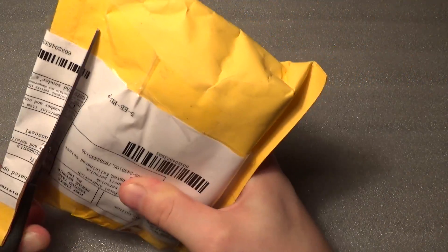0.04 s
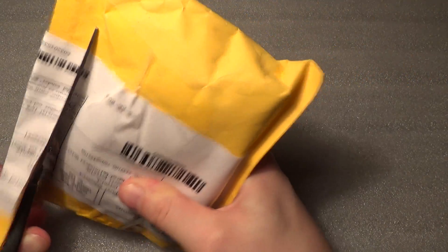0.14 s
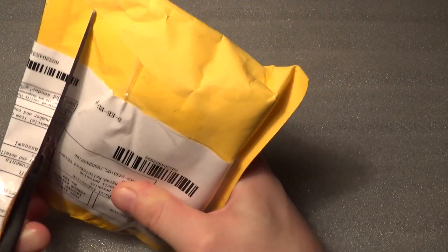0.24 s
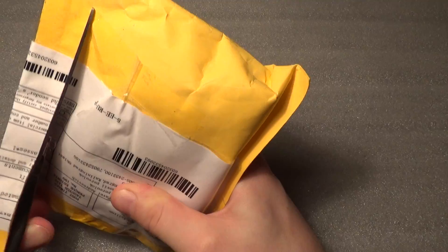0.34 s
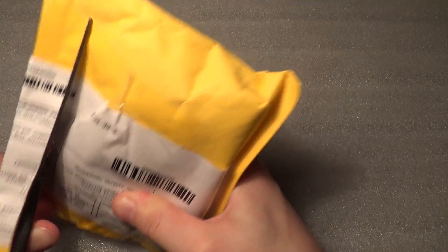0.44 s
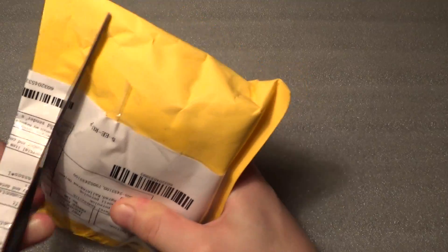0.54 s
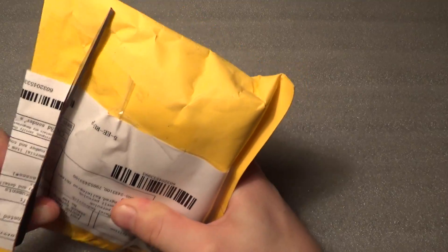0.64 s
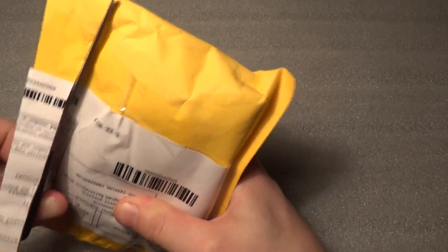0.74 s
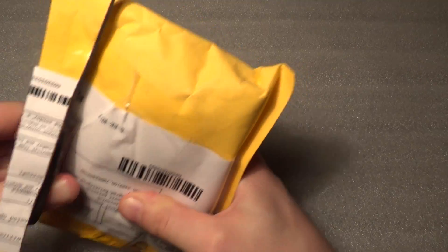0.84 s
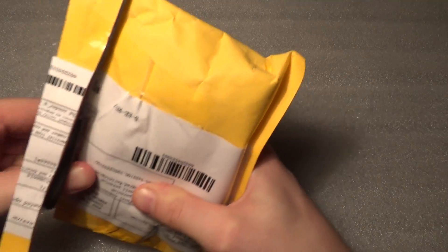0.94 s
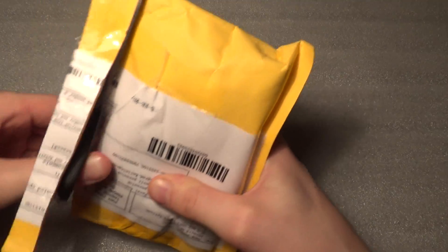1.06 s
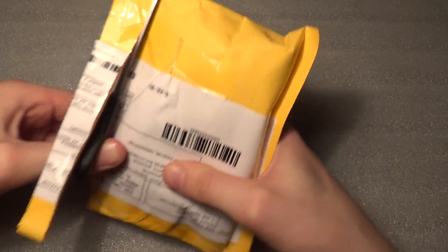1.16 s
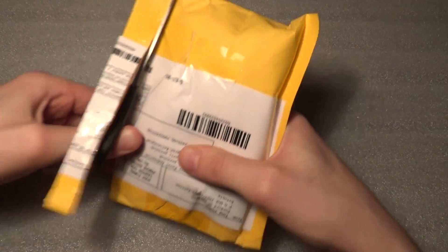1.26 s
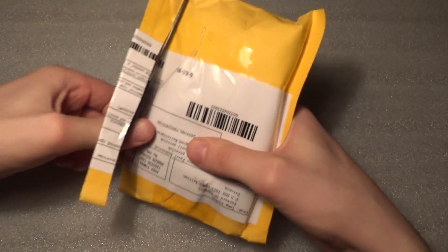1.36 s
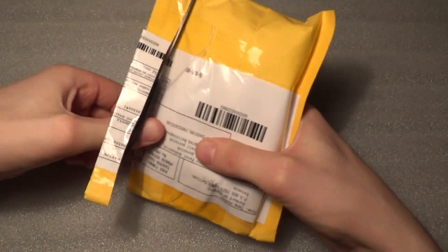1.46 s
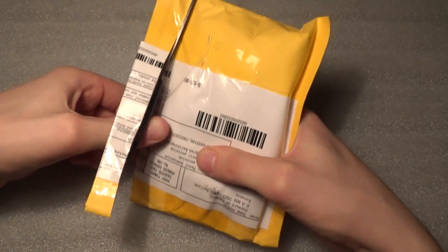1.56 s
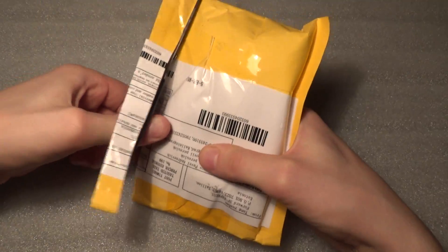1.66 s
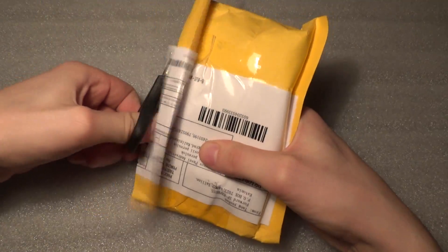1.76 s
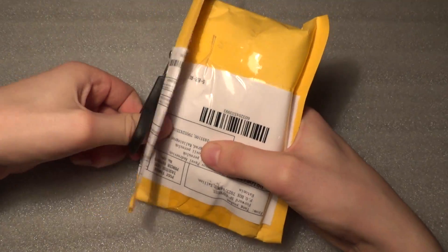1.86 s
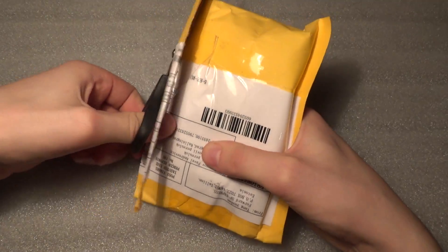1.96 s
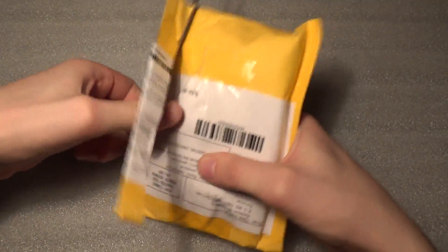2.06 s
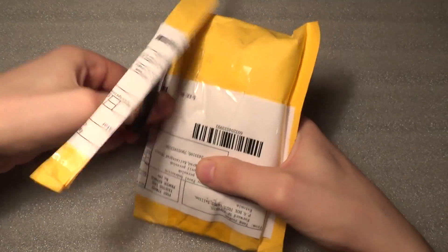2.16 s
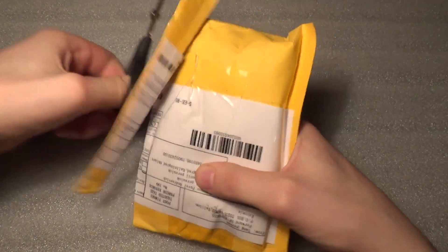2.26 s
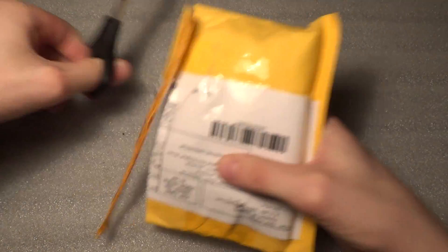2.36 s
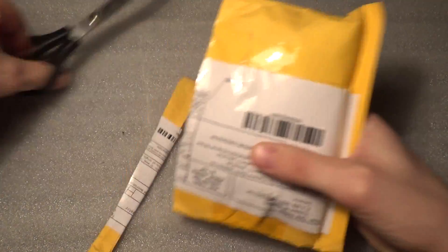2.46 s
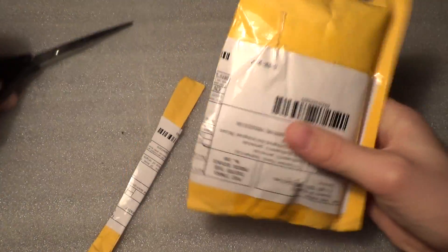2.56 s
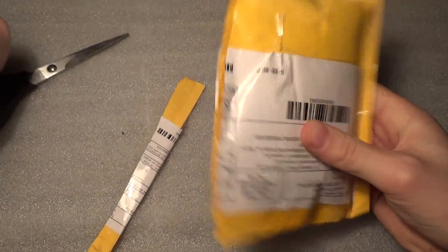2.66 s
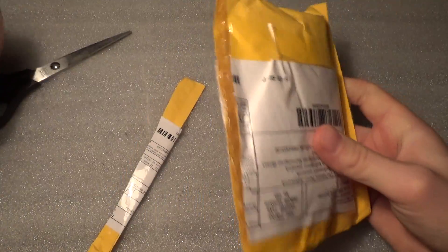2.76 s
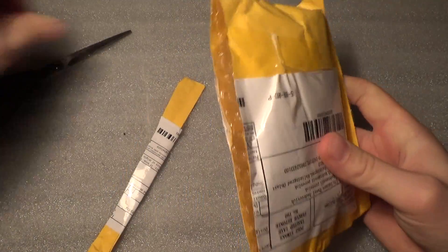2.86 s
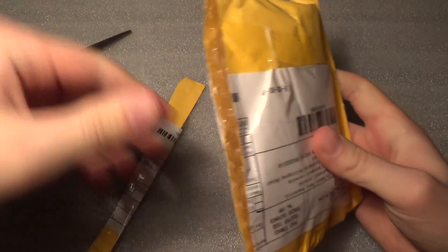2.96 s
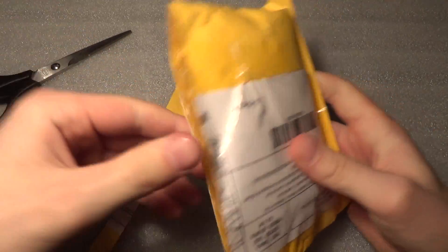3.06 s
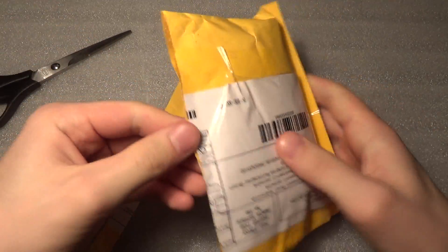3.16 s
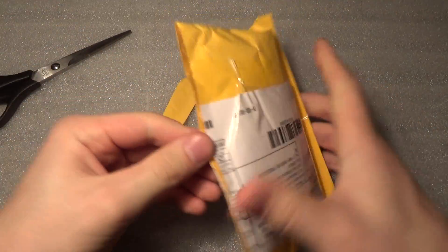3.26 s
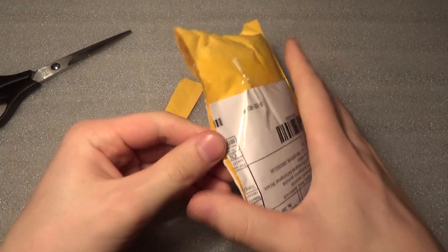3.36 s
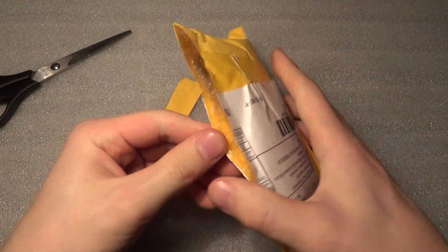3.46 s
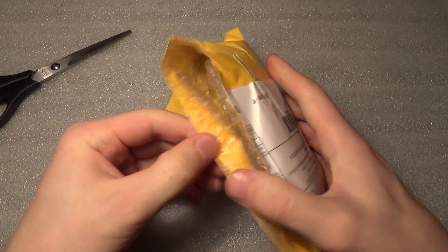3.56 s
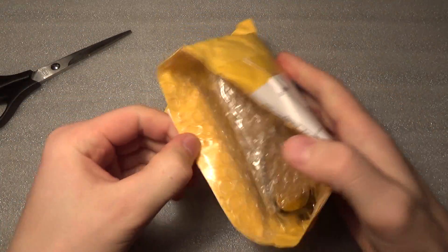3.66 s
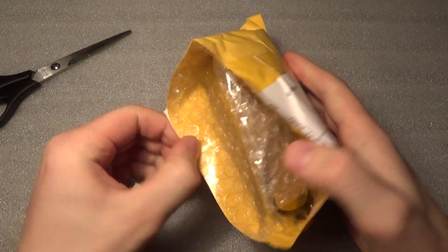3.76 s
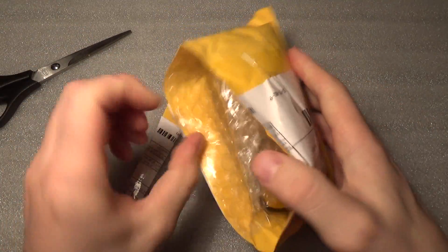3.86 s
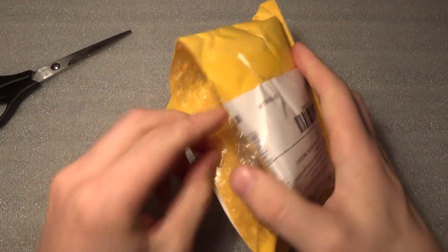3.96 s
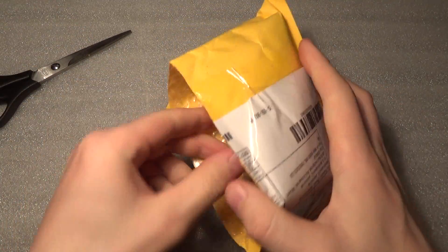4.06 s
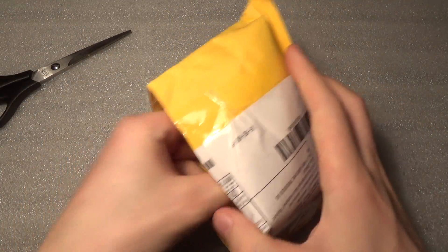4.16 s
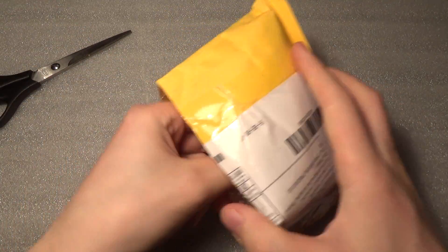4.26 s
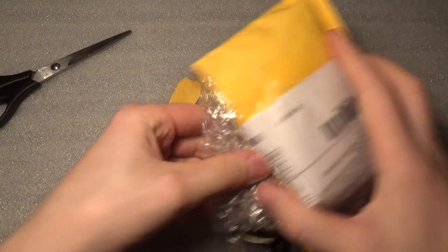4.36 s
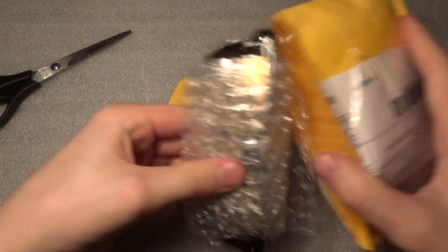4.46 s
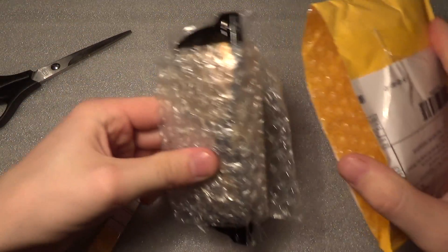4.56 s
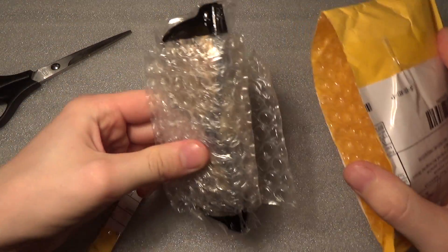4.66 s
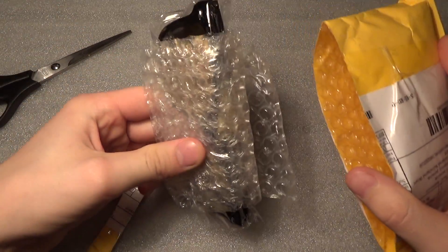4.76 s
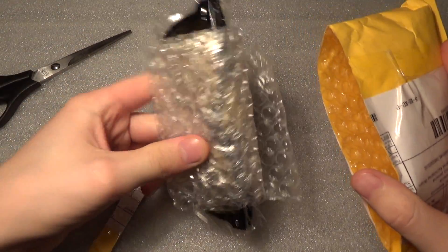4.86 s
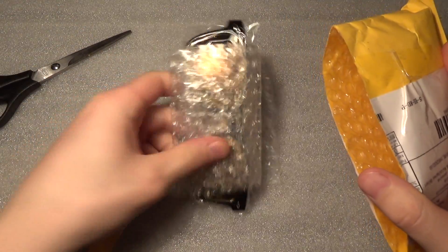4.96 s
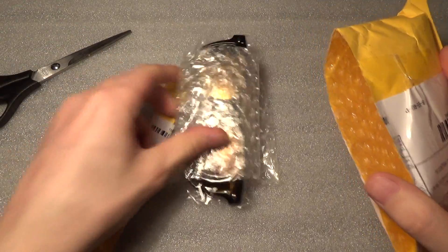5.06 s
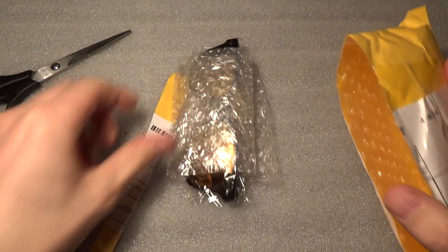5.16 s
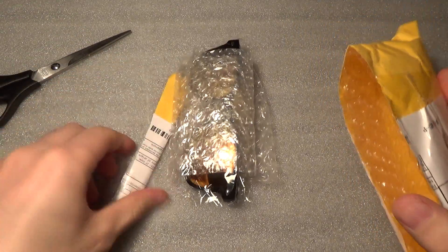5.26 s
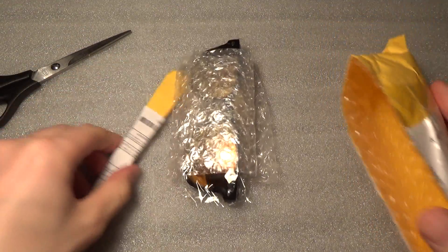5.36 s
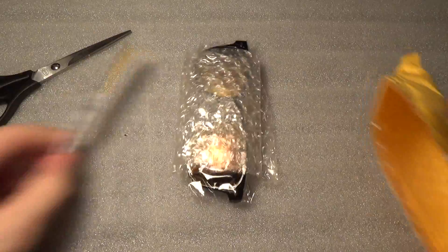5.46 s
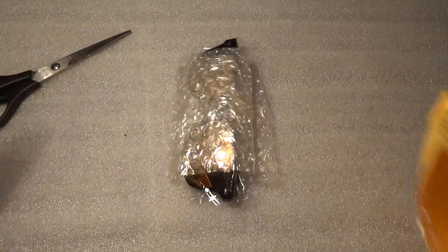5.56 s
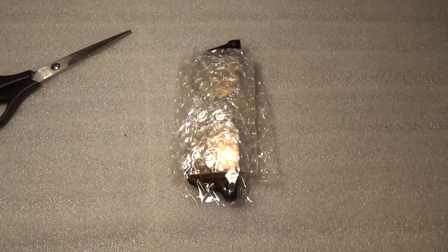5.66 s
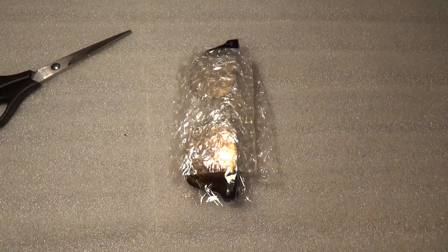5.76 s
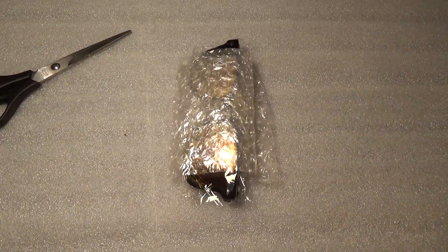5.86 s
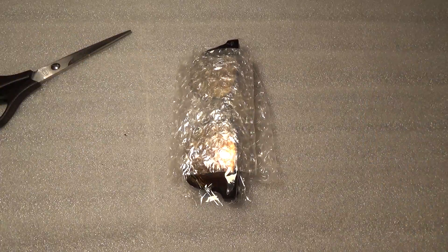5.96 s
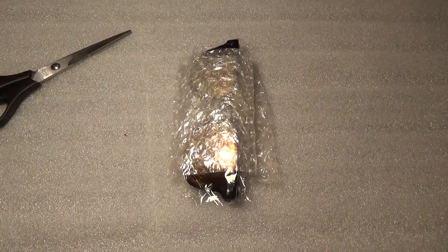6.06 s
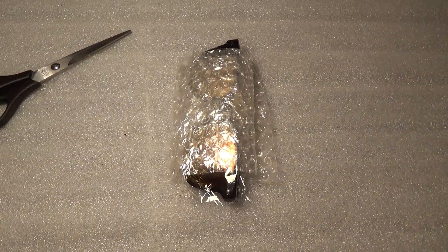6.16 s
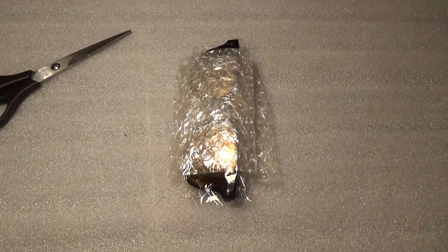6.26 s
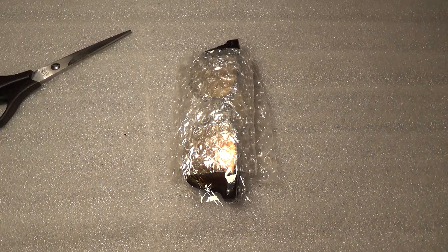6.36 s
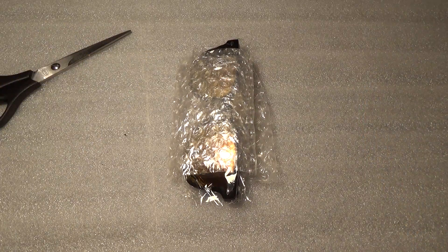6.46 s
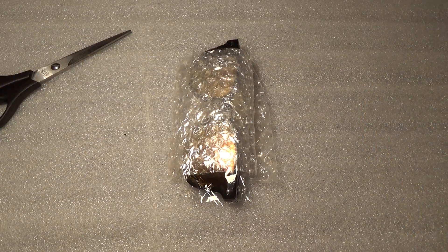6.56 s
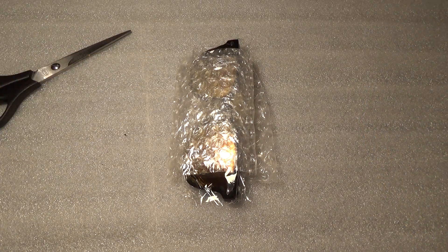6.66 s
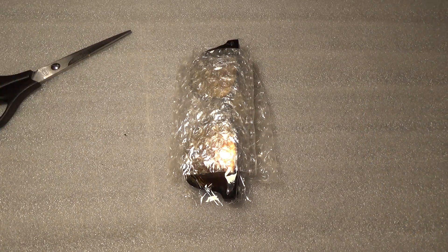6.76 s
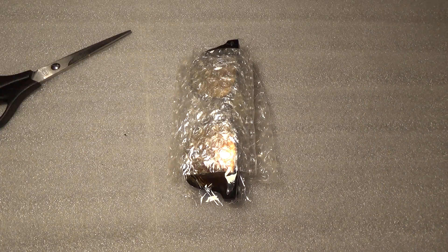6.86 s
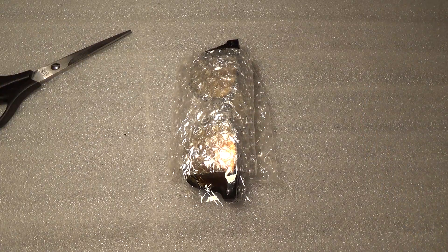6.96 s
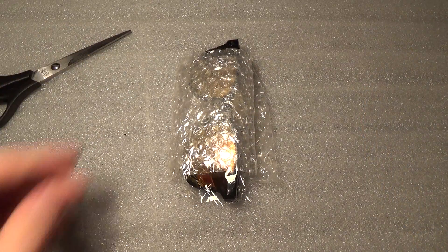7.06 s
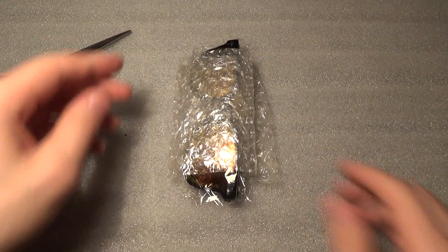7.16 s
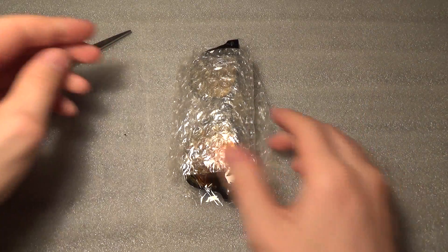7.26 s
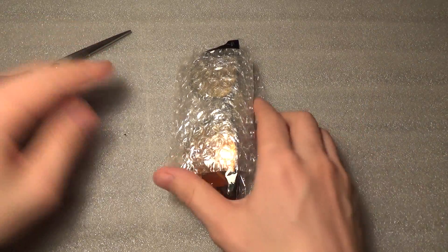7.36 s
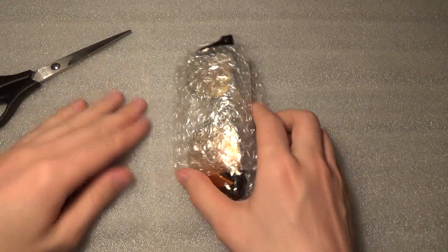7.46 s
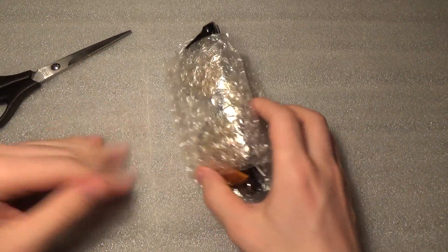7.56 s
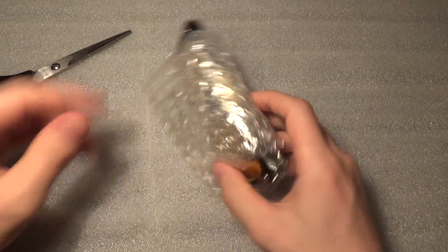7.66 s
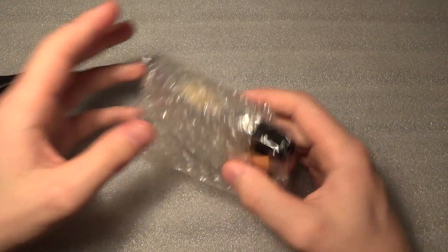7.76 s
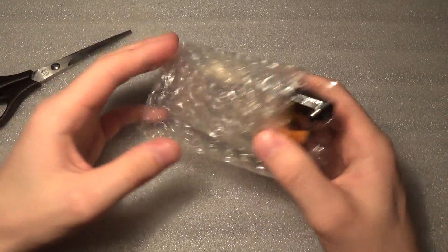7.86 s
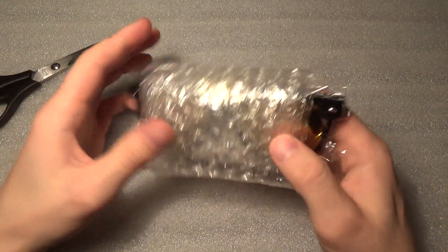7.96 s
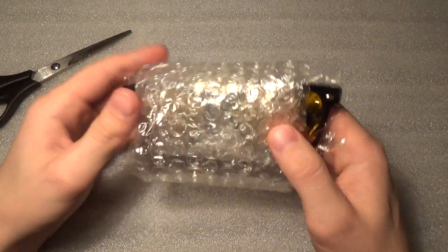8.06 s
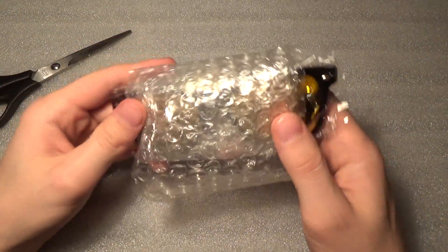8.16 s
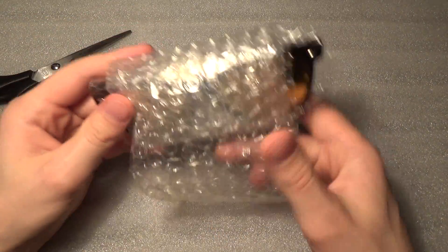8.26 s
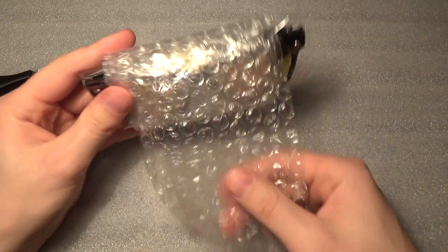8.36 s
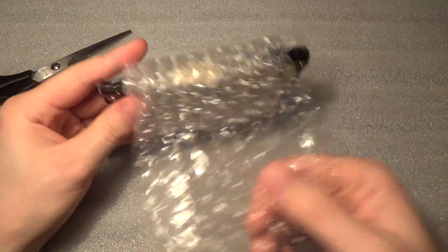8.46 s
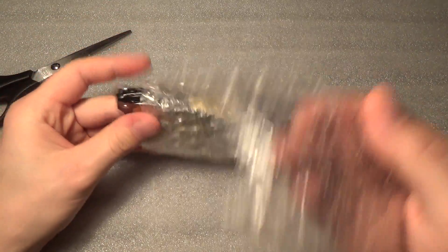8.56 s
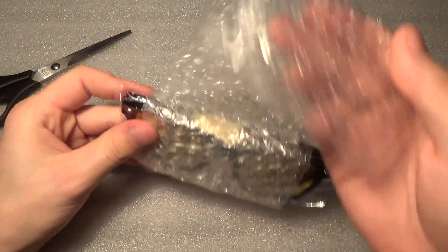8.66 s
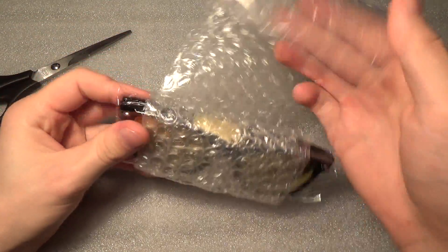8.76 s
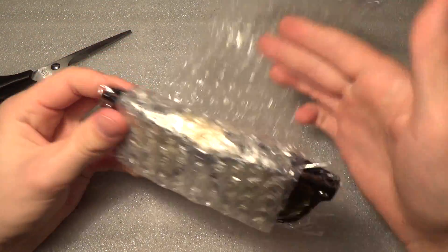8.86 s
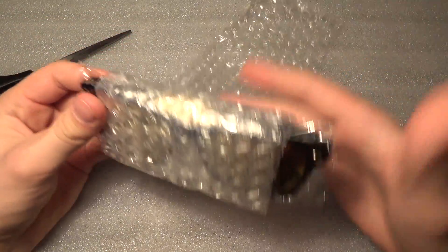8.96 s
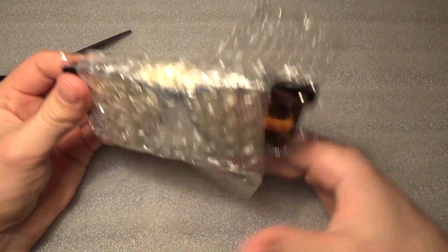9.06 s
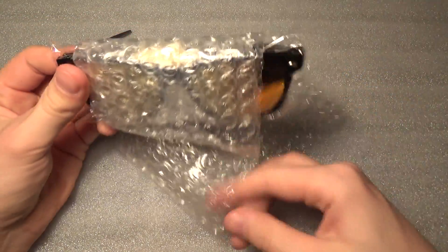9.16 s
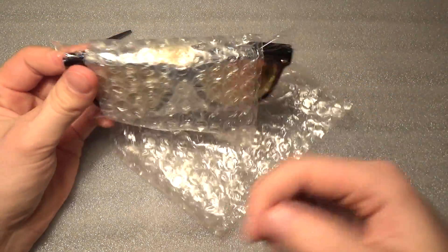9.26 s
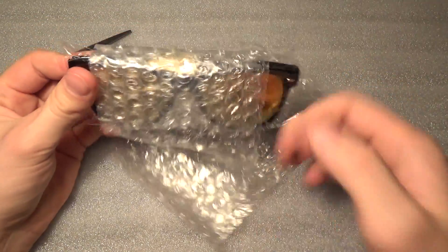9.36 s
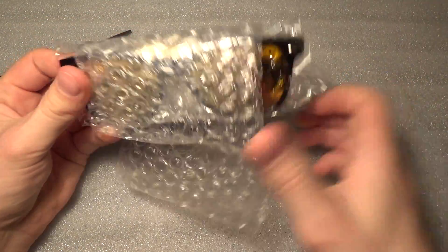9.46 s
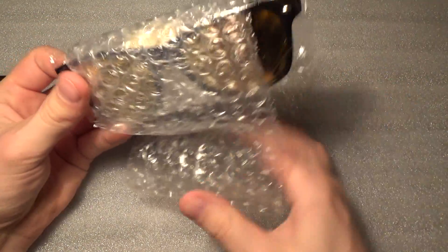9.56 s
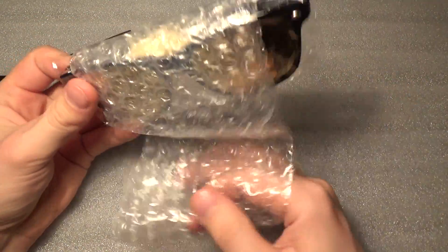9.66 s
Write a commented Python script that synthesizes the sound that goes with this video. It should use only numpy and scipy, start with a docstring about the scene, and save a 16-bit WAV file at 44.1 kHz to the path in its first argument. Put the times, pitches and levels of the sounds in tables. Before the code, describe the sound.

Recorded close in a small, dry, quiet room with soft air noise and a very faint low hum. From 0 to 1.2 seconds, scissors bite through a padded paper envelope: short, rough, crunchy bursts, loudest around 0.5, with dull knocks at 0.1 and 0.35 and a hard snap near 0.7. Lighter slides follow, with a sharp snap and thump at 1.8 and small rustles to 3.2. At 3.5 to 3.9 a tight cluster of bright plastic ticks sounds as the envelope opens, then a boomy paper crunch and knock around 4.2 and rustling as the packet slides out until about 5.3. Soft taps at 5.7, 6.3 and 7.0 punctuate near silence. From 7.3 to the end near 9.8, bubble wrap is handled and unrolled: thin, high, fizzy crinkling in irregular swells, with many crisp snaps, strongest around 7.8 and 8.8 to 9.1.

```python
"""Padded paper envelope cut open with scissors; a bubble-wrapped object is pulled out and unwrapped on a table.
Sheets rub (dense fine slips heard as hiss) and buckle (separate snaps, each a burst of noise with a pitch).
Stiff paper booms low through the envelope's modes; thin film fizzes high; the packet knocks on table or hand.
A small quiet room adds sparse reflections, soft air noise and a faint hum; a close microphone pair hears it all."""
import sys
import numpy as np
from scipy import signal
from scipy.io import wavfile
from scipy.ndimage import uniform_filter1d

SR = 44100
rng = np.random.default_rng(int(sys.argv[2]) if len(sys.argv) > 2 else 0)


def master(y):
    """Save y as 16-bit WAV."""
    cut = np.clip(np.atleast_2d(y).T, -1, 1)
    pcm = np.round(cut * 32767)  # scale
    wavfile.write(sys.argv[1], SR, pcm.astype(np.int16))


N = 428211  # samples


def gain_of(db):
    """Logarithmic level: converts decibels to an amplitude factor."""
    return 10 ** (np.asarray(db) / 20)


def evened(x):
    """Normalisation: scales a signal to rms 1."""
    return x / np.sqrt(np.mean(x ** 2) + 1e-20)


def curves(rows):
    """Linear interpolation: turns the columns of a timed table into one value per sample."""
    s, *columns = np.transpose(rows)
    return [np.interp(np.arange(N) / SR, s, column) for column in columns]


def band(x, hz, kind):
    """Zero-phase filtering: keeps the part of a sound below ("low") or above ("high") hz."""
    return signal.sosfiltfilt(signal.butter(2, hz, kind, fs=SR, output="sos"), x)


def coloured(x, points):
    """Minimum-phase filtering: imposes a spectrum causally, so clicks stay sharp."""
    f, db = np.transpose(points)
    hz = abs(np.fft.fftfreq(8192, 1 / SR))
    log_gain = np.log(gain_of(np.interp(np.log(hz + 1), np.log(f + 1), db)))
    phase = -signal.hilbert(log_gain).imag
    taps = np.fft.ifft(np.exp(log_gain + 1j * phase)).real[:4096]
    return signal.oaconvolve(x, taps[None], axes=1)[:, :N]


def wander(ms):
    """Smoothed random process: slow chance of rms 1 that changes over the given milliseconds."""
    size = max(round(ms * SR / 1000), 2)
    once = uniform_filter1d(rng.standard_normal(N), size)
    return evened(uniform_filter1d(once, size))


def spread(x, db):
    """Level difference between channels: places a sound left by db (right if negative)."""
    return x * gain_of([db / 2, -db / 2]).reshape(2, -1)


def fold(hz, ring_ms, tone, noise):
    """Impulsive buckling: a noise crack decays exponentially, partly resonating at the pitch of the fold."""
    crack = noise * np.exp(-1000 * np.arange(len(noise)) / SR / ring_ms)
    ring = signal.lfilter(*signal.iirpeak(hz, 3, SR), crack)
    zero, pole = np.exp(-2 * np.pi * np.array([.2, 3]) * hz / SR)
    unpitched = signal.lfilter([1, -zero], [1, -pole], crack)  # a broad rise around the pitch
    return tone * ring / np.linalg.norm(ring) + (1 - tone) * unpitched / np.linalg.norm(unpitched)


# modes at which the padded envelope rings dully: pitch_hz [Hz], level_db [dB]
ENVELOPE_MODES = [(410, -2), (660, 1), (1060, -2), (1310, 2)]


def panel(x):
    """Modal resonance: a push on the padded envelope, with the modes it rings."""
    modes = [gain_of(db) * signal.lfilter(*signal.iirpeak(hz, 9, SR), x) for hz, db in ENVELOPE_MODES]
    return x + sum(modes)


# each scissor cut, slide or crunch of the sheets:
# start_s [s], length_s [s], effort_db [dB], paper_boom_db [dB re effort]
MOVES = [(0.029, 0.039, -35, 2), (0.183, 0.06, -32, -4), (0.287, 0.095, -38, -2.5),
         (0.341, 0.018, -27.5, 1), (0.478, 0.054, -21.5, -16.5), (0.569, 0.14, -40, 3.5),
         (0.627, 0.047, -29, -2.5), (0.771, 0.062, -27.5, -11.5), (0.899, 0.077, -37, 0),
         (1.076, 0.018, -31.5, -9), (1.147, 0.011, -33, -3), (1.175, 0.15, -54, 3),
         (1.52, 0.069, -40, -9.5), (1.785, 0.014, -34, -3), (2.073, 0.043, -37.5, -1),
         (2.13, 0.084, -46.5, 2.5), (2.329, 0.031, -48, -0.5), (2.539, 0.19, -46, -6),
         (3.116, 0.17, -48.5, -3), (3.656, 0.086, -35.5, -3), (3.608, 0.01, -21.5, -6),
         (4.012, 0.069, -51, -12), (4.164, 0.03, -31, 6), (4.274, 0.24, -35.5, -3), (4.445, 0.051, -33, 5),
         (4.868, 0.14, -46, -15.5), (4.999, 0.029, -35, -4), (5.013, 0.13, -42, -14),
         (5.293, 0.18, -45, -13), (5.706, 0.014, -41.5, 5), (5.984, 0.077, -45.5, -8.5),
         (6.157, 0.029, -40, -5.5), (6.205, 0.057, -47.5, 4), (6.934, 0.087, -50, 5),
         (7.306, 0.082, -47.5, -24), (7.434, 0.24, -41.5, -12), (7.555, 0.066, -32, -16),
         (7.775, 0.021, -32.5, 0), (8.081, 0.57, -44, -12), (8.323, 0.051, -38, -6),
         (8.385, 0.068, -35.5, -5.5), (8.701, 0.18, -44.5, -10), (8.783, 0.056, -34, -7),
         (8.936, 0.11, -40.5, -13), (9.06, 0.23, -42.5, -8.5), (9.321, 0.16, -41.5, -9.5),
         (9.556, 0.064, -40.5, -13), (9.653, 0.048, -36.5, -1.5)]
# the sheets rustling in the hands between moves:
# start_s [s], effort_db [dB], film_fizz_db [dB re any effort]
HOLDING = [(0, -43.5, -6.5), (.44, -67, -8.5), (.75, -50, -8), (1.04, -62.5, -2.5), (1.3, -55.5, -3),
           (1.98, -64, 4), (2.3, -50.5, 1), (3.0, -63.5, -5.5), (3.3, -54, -2), (3.97, -46.5, 5),
           (4.2, -40, -1.5), (4.65, -52.5, 2.5), (5.24, -57.5, 3), (5.85, -68, 3), (6.25, -56, 4.5),
           (6.75, -70.5, -2.5), (7.28, -66, 1), (7.7, -49, 3), (9.71, -56.5, 1.5)]
HOLDING_BOOM_DB = -5.5  # re the holding effort
ATTACK_S, SWELL = 0.01, 0.041  # SWELL: share of a move's length added to its rise
SAG_DB = 2.5  # fall from start to end of a move
RELEASE_DB_PER_S, SETTLE_DB, SETTLE_DB_PER_S = 2191, -9, 278


def effort():
    """Addition of powers: moves snap on, sag, let go fast and settle slower over the rustle.

    Returns crease level, boom and fizz, and how far the moves lift the level above the rustle, all in dB.
    """
    rest_db, film_db = curves(HOLDING)
    creases = gain_of(2 * rest_db)  # doubled dB gives power
    paper = gain_of(2 * (rest_db + HOLDING_BOOM_DB))
    for start, length, db, move_boom_db in MOVES:
        first = round(start * SR)
        t = np.arange(0, length + .3, 1 / SR)[:N - first]
        after = np.maximum(t - length, 0)
        settling = (after > 0) * gain_of(SETTLE_DB - SETTLE_DB_PER_S * after)
        release = gain_of(-RELEASE_DB_PER_S * after) + settling
        rise = np.minimum(t / (ATTACK_S + SWELL * length), 1)
        sag = SAG_DB * (np.minimum(t / length, 1) - .5)
        shape = rise * gain_of(db - sag) * release
        creases[first:][:len(t)] += shape ** 2
        paper[first:][:len(t)] += (gain_of(move_boom_db) * shape) ** 2
    effort_db = 10 * np.log10(creases)
    return effort_db, 10 * np.log10(paper / creases), film_db, effort_db - rest_db


def rub(effort_db):
    """Stick-slip friction: slips too dense to count, a hiss that flutters, smoother the harder the rub."""
    both, left, right = rng.standard_normal((3, N))
    hiss = both + .25 * np.array([left, right])
    slow_flutter_db = np.clip(-.12 * (effort_db + 28), 0, 3)
    return evened(hiss * gain_of(2.46 * wander(ms=5.5) + slow_flutter_db * wander(ms=21.6)))


def crackle(per_s, size_db, count):
    """Random impulse process: folds of many pitches buckle in clumps; a few are much larger than the rest."""
    rate = per_s * gain_of(6.6 * wander(ms=25))
    happens = rng.random(N) < rate / SR
    sizes = gain_of(size_db * np.minimum(rng.exponential(1, N), 3.2)) * happens
    which, out = rng.integers(0, count, N), np.zeros((2, N))
    for k, hz in enumerate(np.geomspace(1500, 14500, count)):
        grain = fold(hz, rng.uniform(.15, .9), .6, rng.standard_normal(400))
        buckles = signal.oaconvolve(sizes * (which == k), grain)[:N]
        out += spread(buckles, 2 * rng.standard_normal())
    return evened(out)


# spectrum of the sheets as the microphone colours them: frequency_hz [Hz], level_db [dB per Hz]
SHEET = [(59, -68), (100, 2.5), (271, 3.5), (500, 0.5), (659, 3), (797, 1.5), (5500, 1), (6400, -10),
         (7400, -3.5), (11500, 0), (15800, -8.5)]
# spans in which moves do not reduce the share of crackle: start_s [s], end_s [s]
WRAP_IN_HAND = [(3.48, 5.2), (7.3, 9.8)]
PAPER_HZ, FILM_HZ, FIZZ_HZ = 1300, 6500, 11000  # top of the boom, bottom of the film, its upper fizz


def sheets():
    """Band-wise radiation: rub and crackle, shared out to paper, creases and film by the hands' effort."""
    effort_db, paper_db, film_db, over_db = effort()
    paper_db = paper_db + 3.3 * wander(ms=78)  # creases keep shifting the colour
    film_db = film_db + 3.3 * wander(ms=51)

    # snappy is crackle's share of the power; resting sheets hiss
    snappy = np.clip(0.5 + 0.025 * film_db, 0, 1) * np.clip((effort_db + 70) / 16, 0, 1)
    wrap = sum((np.arange(N) > a * SR) & (np.arange(N) < b * SR) for a, b in WRAP_IN_HAND)
    snappy = snappy * np.where(wrap, 1, gain_of(-3 - .6 * over_db))  # film buckles, sliding paper hisses
    rubbing = np.sqrt(1 - snappy) * rub(effort_db)
    buckling = np.sqrt(snappy) * crackle(230, 3.0, count=24)
    motion = coloured(rubbing + buckling, SHEET)

    low = band(band(motion, PAPER_HZ, "low"), 225, "high")
    high = band(motion, FILM_HZ, "high")
    creases = evened(band(motion - low - high, 550, "high"))
    boom = gain_of(paper_db) * evened(panel(low))
    film = evened(high)
    film = film + (gain_of(0.61 * film_db) - 1) * band(film, FIZZ_HZ, "high")  # paper lacks the top
    fizz = gain_of(film_db) * film
    # hands and packet shake the table
    rumble = evened(band(band(rng.standard_normal(N), 180, "low"), 55, "high")) * gain_of(paper_db - 23)
    return gain_of(effort_db) * (creases + boom + fizz + rumble)


# spectrum of the still air and microphone hiss: frequency_hz [Hz], level_db [dB per Hz]
ROOM_AIR = [(25, -13.5), (91, -13.5), (126, -8), (371, -15.5), (437, -15.5), (513, -21), (905, -17),
            (6500, -55), (15800, -52)]
ROOM_AIR_DB = -63
HUM_HZ, HUM_DB = 123.2, -72  # centres about which the hum wavers


def background():
    """Stationary noise and a modulated tone: still air and microphone hiss, with a wavering hum."""
    both, left, right = rng.standard_normal((3, N))
    air = evened(coloured(both + .12 * np.array([left, right]), ROOM_AIR))
    hum_hz = HUM_HZ + 1.92 * wander(ms=50)
    hum = np.sqrt(2) * np.sin(2 * np.pi * np.cumsum(hum_hz) / SR)
    return gain_of(ROOM_AIR_DB) * air + gain_of(HUM_DB + 4.7 * wander(ms=12)) * hum


# the packet knocks on table or hand: start_s [s], level_db [dB], pitch_hz [Hz], puff_decay_ms [ms]
KNOCKS = [(0.098, -23.5, 330, 2.1), (0.35, -20.5, 590, 5.9), (1.798, -24.5, 564, 11),
          (4.171, -27.5, 228, 28), (5.711, -31, 324, 12), (6.28, -35, 375, 29), (6.986, -36, 356, 57)]


def knocks():
    """Damped oscillation: a soft push on the padded packet is a short tap, one low swing and a dull puff."""
    out, t = np.zeros(N + SR), np.arange(8000) / SR
    for (s, db, hz, ring_ms), noise in zip(KNOCKS, rng.standard_normal((len(KNOCKS), len(t)))):
        puff = evened(band(band(noise, 1.27 * hz, "low"), hz / 2, "high")) * np.exp(-1000 * t / ring_ms)
        swing = np.sin(2 * np.pi * hz * t) * np.exp(-t * hz * 0.61)
        tap = evened(band(noise, 4 * hz, "low")) * np.exp(-t / .003)
        onset = 1 - np.exp(-t / 0.00008)
        push = (swing + 0.5 * tap + 0.46 * puff) * onset
        rumble_cut = signal.butter(2, 0.45 * hz, "high", fs=SR, output="sos")
        out[round(s * SR):][:len(t)] += gain_of(db) * signal.sosfilt(rumble_cut, push)
    return panel(out[:N])


# single loud buckles: start_s [s], strength_db [dB], pitch_hz [Hz]
SNAPS = [(0.2576, -2, 2950), (0.372, -6.5, 850), (0.677, 4.5, 1900), (1.141, -13.5, 1680),
         (1.6567, -16.5, 5400), (1.7995, 1.5, 5770), (2.137, -23, 1510), (2.163, -8, 900),
         (2.2212, -9, 5630), (2.4995, -9.5, 1440), (2.55, -13, 1360), (2.708, -19, 1390),
         (3.1664, -7.5, 1610), (3.495, -6.5, 4830), (3.589, -2.5, 10900), (3.608, -5, 9000),
         (3.6232, -12, 2570), (3.645, -3, 9750), (3.689, -2, 9000), (3.7085, -1, 4220), (3.7268, -1, 4280),
         (3.758, -3.5, 2470), (3.9069, -3, 5500), (4.176, 2.5, 1480), (4.1897, 4.5, 3500),
         (4.486, -4.5, 1710), (4.7008, 3, 7400), (4.947, -6, 9600), (6.281, -10, 1400), (6.986, -17, 1880),
         (7.384, -10, 10600), (7.517, -3, 12600), (7.578, -12, 11100), (7.766, 3, 11400),
         (7.792, -2.5, 3050), (7.8051, -1, 9700), (7.902, -10, 6900), (7.949, -1.5, 12000),
         (7.97, -2.5, 12000), (8.115, -6, 8300), (8.125, -7, 9200), (8.2181, -6.5, 2520),
         (8.291, -16, 2590), (8.323, -11, 2720), (8.453, -13, 3180), (8.561, -4, 5700),
         (8.638, -3.5, 11000), (8.789, -5.5, 9700), (8.808, -7, 8080), (8.8331, 3, 10500),
         (8.9554, 0.5, 8600), (8.973, -7, 10200), (9.022, -5.5, 7340), (9.1066, -1.5, 1880),
         (9.383, -5, 5600), (9.407, -0.5, 10100), (9.575, -9, 4370)]


def snaps():
    """Sudden buckling: each loud snap is a fold, with the crease settling for a few cycles of its pitch."""
    out = np.zeros((1, N + SR))
    for (s, db, hz), noise in zip(SNAPS, rng.standard_normal((len(SNAPS), 2, 900))):
        crack = fold(hz, 0.35, .45, noise[0])
        settling = fold(hz, 1 + 6000 / hz, 0.8, noise[1])
        buckle = crack + 0.6 * settling
        out[0, round(s * SR):][:len(buckle)] += gain_of(db) * buckle / np.linalg.norm(buckle)
    colour = coloured(np.eye(1, N), SHEET)  # impulse response, whose energy is divided out
    return coloured(out, SHEET) / np.linalg.norm(colour)


def room(x, t60):
    """Reverberation: sparse reflections of random sign from table and walls, dying 60 dB in t60 seconds."""
    t = np.arange(round(.3 * SR)) / SR
    signs = rng.choice([-1., 1.], (2, len(t)))
    present = (rng.random((2, len(t))) < .06) * (t > .002)
    taps = signs * present * gain_of(-60 * t / t60)
    taps = taps[0] + band(taps, 570, "high")  # the microphones differ only in the higher part
    return signal.oaconvolve(x.mean(0)[None], taps / np.linalg.norm(taps[0]), axes=1)[:, :N]


# where the hands are: start_s [s], left_minus_right_db [dB]
PLACE = [(0.5, 1.2), (5.4, 0), (6.3, -2), (7.4, 0.8)]


def scene():
    """Superposition: the sheets close by, their reflections and the quiet room."""
    near = sheets() + snaps() + knocks()
    bass = band(near, 770, "low")
    middle = bass.mean(0)
    shared_bass = middle + .65 * (bass - middle)  # long waves reach both microphones nearly alike
    near = shared_bass + spread(near - bass, *curves(PLACE))
    return near + gain_of(-14) * room(near, t60=.13) + background()


TREBLE_END_HZ, EDGE_HZ = 15950, 16930  # where the shelf begins, where the band ends


def record(dry):
    """Linear-phase filtering: the top treble is shelved away, then the band is limited."""
    shelf = signal.firwin(301, TREBLE_END_HZ, window=("kaiser", 7), fs=SR)
    below = signal.oaconvolve(dry, shelf[None], "same")
    shelved = below + gain_of(-38) * (dry - below)
    edge = signal.firwin(801, EDGE_HZ, window=("kaiser", 10), fs=SR)
    return signal.oaconvolve(shelved, edge[None], "same")


dry = scene()
out = record(dry)
master(out)
```